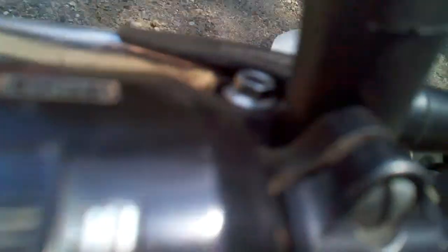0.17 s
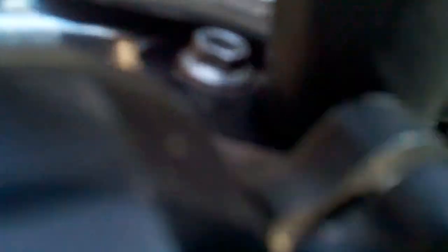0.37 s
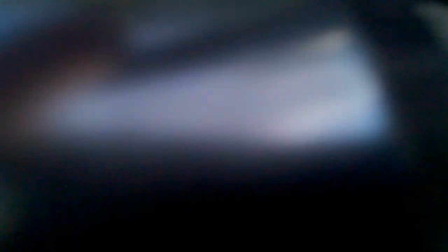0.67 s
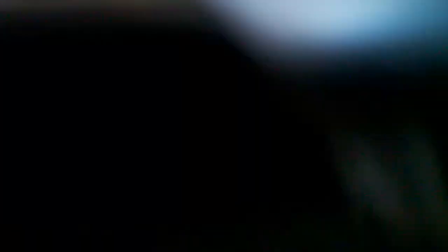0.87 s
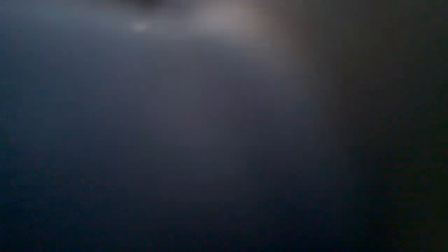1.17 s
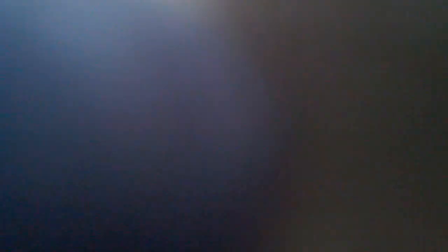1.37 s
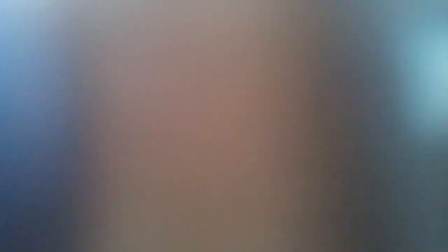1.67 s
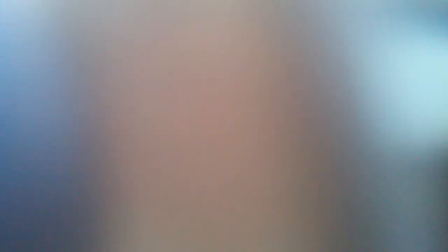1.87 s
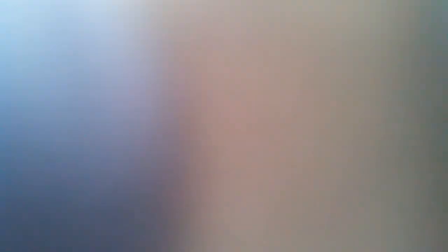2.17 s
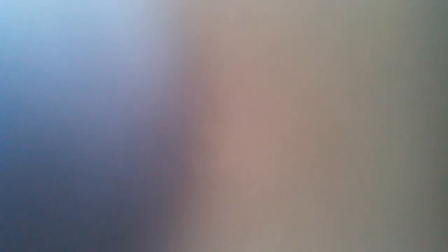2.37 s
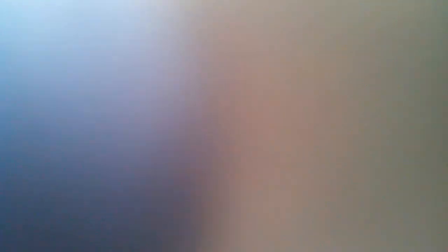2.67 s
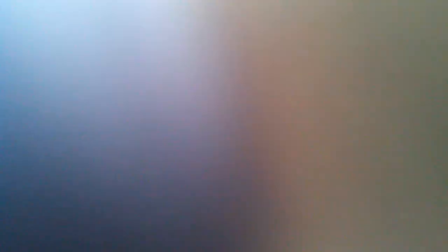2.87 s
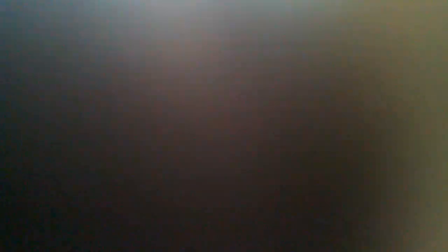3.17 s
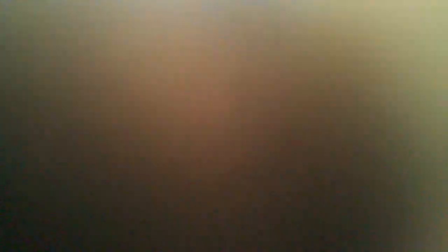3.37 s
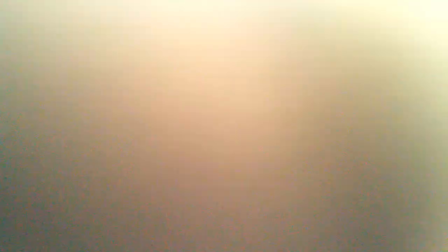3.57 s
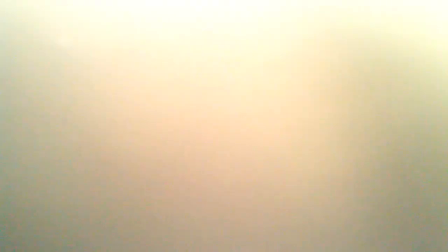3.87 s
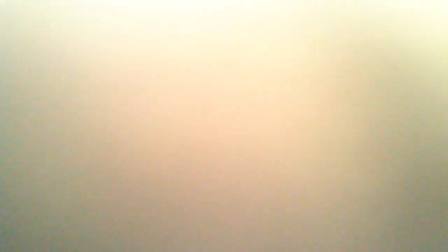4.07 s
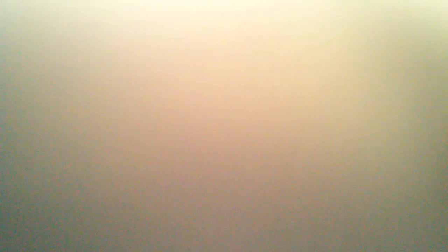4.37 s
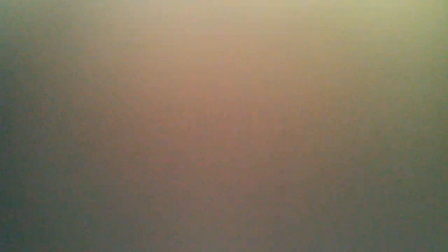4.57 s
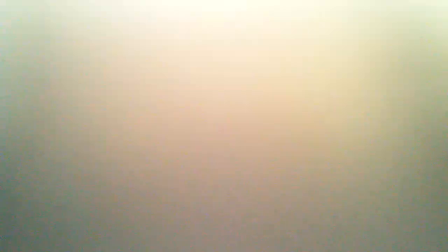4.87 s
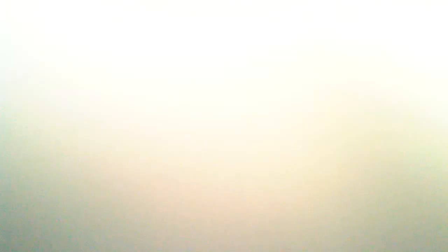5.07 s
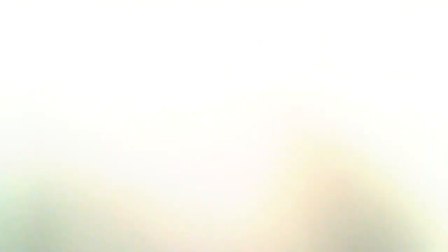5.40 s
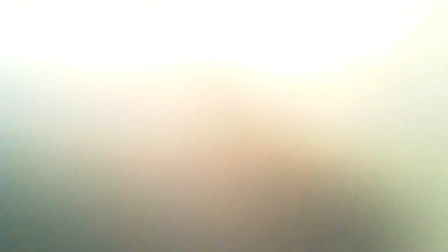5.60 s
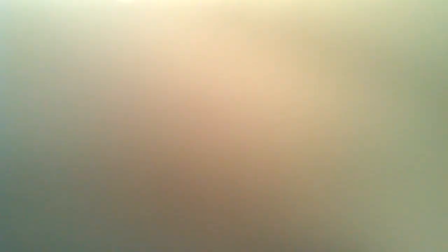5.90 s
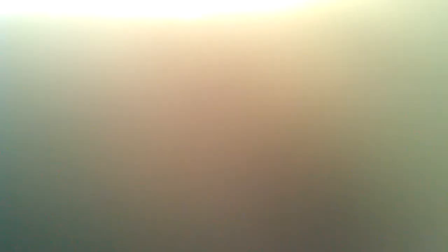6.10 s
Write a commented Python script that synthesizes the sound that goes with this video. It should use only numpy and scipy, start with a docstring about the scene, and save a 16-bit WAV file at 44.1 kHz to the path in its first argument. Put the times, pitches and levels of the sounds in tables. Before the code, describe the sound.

Close up, a two-stroke motorbike sputters irregularly, revs once, stumbles and rides off at a steady buzz with light wind buffeting.

```python
"""Two-stroke dirt bike pulling away.

It idles, firing only on some turns, is blipped, stutters on every second turn and rides off. Gas slugs ring
the pipe; piston slap, ring chatter and gas rush shake casing and fins. A handheld two-port microphone sits
by the frame: the boom fills the left port; clatter and hiss reach both, early and inverted on the left.
Wind buffets the ports once the bike rolls."""
import sys
import numpy as np
from scipy import signal
from scipy.fft import rfft, irfft, next_fast_len
from scipy.io import wavfile
from scipy.ndimage import uniform_filter1d, map_coordinates

SR = 44100
rng = np.random.default_rng(int(sys.argv[2]) if len(sys.argv) > 2 else 0)


def persist_wave(psi):
    """Save psi, clipped to +-1, as 16-bit WAV."""
    counts = np.round(np.clip(psi, -1, 1) * 32767).astype(np.int16)
    wavfile.write(sys.argv[1], SR, np.atleast_2d(counts).T)


N = 275184
TIME_S = np.arange(N) / SR


def exhaust():
    """Pops and puffs at both microphone ports, later and weaker on the right."""
    out = np.zeros((2, N))
    for start_s, wave in [*pops(), *puffs()]:
        lag_s = 0.000067 + 0.00055 * pace(start_s)
        add(out[0], start_s, wave)
        add(out[1], start_s + lag_s, amp(-21.5 + 14.5 * in_open(start_s)) * wave)
    return amp(8.5) * highpass(out, hz=200, order=5)


# Single firings: t/s, boom level/dB, blow-off level/dB
FIRINGS = [(0.0, -15.5, -29.5), (0.145, -19.5, -68), (0.226, -15.5, -35.5), (0.35, -19.5, -62),
           (0.431, -16, -31), (0.512, -23.5, -65), (0.6, -14, -28.5), (0.756, -18, -42), (0.84, -14, -30.5),
           (0.963, -24, -59), (1.008, -10.5, -24.5), (1.254, -9, -23.5), (1.454, -13.5, -41),
           (1.644, -11, -28.5), (1.801, -10, -26.5), (1.948, -15.5, -40), (2.026, -18, -43),
           (2.106, -13.5, -39), (2.186, -19, -65), (2.274, -11.5, -34), (2.409, -10.5, -28),
           (2.636, -10, -28.5), (2.762, -10.5, -23), (2.816, -10.5, -27), (2.838, -11, -28.5),
           (2.857, -11.5, -26), (2.875, -14.5, -37), (3.445, -13, -46), (3.493, -11.5, -16.5),
           (3.587, -10, -13.5), (3.65, -12, -17), (3.712, -11, -24.5), (3.752, -12.5, -21.5),
           (3.794, -14, -66), (3.835, -11.5, -21.5), (3.875, -10, -17.5), (3.919, -13.5, -31),
           (3.963, -12, -18.5), (4.009, -11, -21.5), (4.059, -12, -23.5), (4.106, -12, -24),
           (4.156, -12.5, -25), (4.204, -10.5, -23.5)]


def pops():
    """Single firings boom in the pipe; stronger ones ring higher, with a smaller share of bark."""
    rise_s, loudest_db = .0026, max(db for _, db, _ in FIRINGS)
    for s, db, _ in FIRINGS:
        detune, *side_luck = rng.standard_normal(5)[2:] * roughness(s)
        hz = (pipe_hz(s) + db + 3) * (1 + .012 * detune)
        wave = pipe_ring(s, hz, rise_s, side_luck, hold_s=.0135 if s > 3 else .012,
                         bark_db=-12.5 + 0.1 * (loudest_db - db), side_db=0, tail_db=-15, samples=4400)
        yield s + .001 - rise_s, amp(db) * wave


def blow_off():
    """Envelope of escaping burnt gas: swells before each pop, peaks, lasts until the exhaust port shuts."""
    out, t = np.zeros(N), np.arange(4000) / SR
    before_turns, after_turns = .33, .7
    s, turns = crank()
    for pop_s, _, db in FIRINGS:
        lead_s = pop_s - np.interp(np.interp(pop_s, s, turns) - before_turns, turns, s)
        swell = np.sin(np.pi / 2 * np.clip(t / lead_s, 0, 1)) ** 2
        peak = np.exp(-(np.maximum(t - lead_s, 0) / 0.0094) ** 2)
        port_open = 1 / (1 + np.exp((t - lead_s * (1 + after_turns / before_turns)) / .003))
        add(out, pop_s - lead_s, amp(db) * swell * (1.025 * peak + 0.13 * port_open))
    return out


def puffs():
    """Two puffs a turn, scattered when rough; a pop replaces the first."""
    throttle_shut_s, loaded_from_s = 2.9, 4.23
    pop_s = np.array(FIRINGS)[:, 0]
    first = [(s, 0) for s in turn_times(0) if np.min(abs(pop_s - s)) > .009]
    second = [(s, -14.5 + 12.5 * roughness(s)) for s in turn_times(0.4596)]
    for s, offset_db in first + second:
        rough = roughness(s)
        late, louder, detune, *side_luck = rng.standard_normal(5) * rough
        db = level_db(-28.5, per_effort=1.112, riding_db=4, open_db=-1, at_s=s) + offset_db + 2 * louder
        hz = pipe_hz(s) * (1 + 0.11 * rough * detune) * (1 + .012 * detune)
        softness = (s > throttle_shut_s) * np.clip(1 - (s - throttle_shut_s) / 0.45, 0, 1)
        rise_s = .0033 + 0.0075 * softness
        wave = pipe_ring(s, hz, rise_s, side_luck, hold_s=0.008 if s > loaded_from_s else 0.0063,
                         bark_db=-17, side_db=3.5 * rough, tail_db=-80, samples=2400)
        yield s + .0005 * late + .001 - rise_s, amp(db) * wave


def pipe_hz(at_s):
    """Pipe pitch: up with effort and speed, down as the pipe cools on overrun."""
    return 320.8 + 2 * effort_db(at_s) + 20.1 * min(pace(at_s), 1.6) - 32 * overrun(at_s)


SILENCER = signal.butter(6, 510, fs=SR, output="sos")
# Pipe side tones: f/Hz, level/dB, t60/s
SIDE_TONES = [(416, -13, 0.099), (255, -19.5, 0.027)]


def pipe_ring(at_s, hz, rise_s, side_luck, hold_s, bark_db, side_db, tail_db, samples):
    """A slug of gas rings the pipe until the inverted echo from the cone chokes it."""
    t = np.arange(samples) / SR
    residue, sag_hz_per_s, bark_hz = 0.14, 960, 577
    swell = np.sin(np.pi / 2 * np.minimum(t / rise_s, 1)) ** 2
    choke = residue + (1 - residue) / (1 + np.exp((t - rise_s - hold_s) / .002))
    ring = damped_sine(t, hz, 0, t60_s=0.15) * choke
    side_db = side_db + 5 * in_open(at_s) + 2.5 * overrun(at_s)
    for (side_hz, db, t60_s), luck in zip(SIDE_TONES, side_luck):
        ring += damped_sine(t, side_hz, db + side_db + 2.5 * luck, t60_s) * np.sqrt(choke)
    cooling_tail = damped_sine(t, hz - sag_hz_per_s * t / 2, tail_db, t60_s=0.2)
    ring += cooling_tail * (1 - choke) * np.cos(np.pi / 2 * t / t[-1])
    tailpipe_bark = damped_sine(t, bark_hz, bark_db + 1.5 * in_open(at_s), t60_s=0.036)
    return signal.sosfilt(SILENCER, ring * swell) + tailpipe_bark * swell


# Casing modes: f/Hz, width/Hz, unloaded level/dB, full-load gain/dB
CASING_MODES = [(700, 184, -3, 1), (982, 29.7, 8.5, -11.5), (1103.6, 30.8, 7.5, -10.5), (1211, 26, 5, 1.5),
                (1300, 134, -2.5, 0), (1487, 8.5, -0.5, 6)]
# Fin modes: f/Hz, width/Hz, unloaded level/dB, full-load gain/dB
FIN_MODES = [(1606, 2310, -4, 1.5), (1827, 63, 1.5, -28), (1883, 17.4, 7.5, -7.5), (2130, 422, 3.5, -1),
             (2257, 77, 1.5, 10), (2890, 1390, -3.5, 0), (3346, 650, -6, -16), (3980, 340, -23.5, 19)]
# Exhaust port rasp: f/Hz, width/Hz, unloaded level/dB, full-load gain/dB
RASP_MODES = [(2780, 555, 4, 1)]
# Casing and fin swell: t/s, level/dB
CLATTER_TRIM = [(0, 1), (0.5, -0.5), (1.0, 1.5), (1.6, 2), (2.2, 2), (2.7, 1), (2.85, 4.5), (3.1, 4),
                (3.45, 1), (3.8, 0), (4.2, -0.5), (4.35, 3), (5.3, 2.5), (6.24, 2.5)]


def clatter(gas, slaps, contacts):
    """Piston slap, ring chatter and gas rush shake casing and fins; the exhaust port rasps."""
    grain = chatter_noise()
    chatter = amp(2.2 * drift(53))
    casing_db = level_db(-27.5, per_effort=0.03, riding_db=4.5, open_db=6) - 4 * np.sqrt(overrun())
    casing_hits = grain * (chatter + 0.27 * slaps) + amp(-2.5) * contacts
    casing = resonate(amp(casing_db) * casing_hits + amp(-8) * gas * grain, CASING_MODES)
    fin_db = level_db(-30, per_effort=0.4952, riding_db=0, open_db=-1)
    fin_slaps = slaps * np.maximum(np.sqrt(roughness()), 0.28)
    fin_hits = grain * (.62 * chatter + 1.7 * fin_slaps) + .9 * contacts
    fins = resonate(amp(fin_db) * fin_hits + amp(0.5) * gas * grain, FIN_MODES)
    rasp_db = -40.5 + 11 * np.clip(pace(), 0, 1) * (1 - overrun())
    rasp = resonate((amp(rasp_db) + amp(0.5) * gas) * grain, RASP_MODES)
    return amp(curves(CLATTER_TRIM)[0]) * (casing + fins) + rasp


def piston_slaps():
    """Two slaps a turn: their envelope and their first-contact impulses, harder when rough."""
    slaps, contacts, t = np.zeros(N), np.zeros(N), np.arange(900) / SR
    shape = np.minimum(t / .0004, 1) * np.exp(-t / .0038)
    for offset_turns, db in [(.65, 8.5), (.1, -3)]:
        times = turn_times(offset_turns)
        times += .0008 * rng.standard_normal(len(times)) * np.sqrt(roughness(times))
        for s, rough, luck in zip(times, roughness(times), rng.standard_normal(len(times))):
            add(slaps, s, amp(db + 1.2 * luck * rough) * shape)
            add(contacts, s, amp([db + 14 + (6 + luck) * rough]))
    return slaps, contacts


def chatter_noise():
    """Gears and rings: fresh noise when rough, partly a crank-locked, slowly changing pattern when smooth."""
    pattern_s, points = .22, 400
    patterns = rng.standard_normal((int(N / SR / pattern_s) + 2, points))
    row, column = TIME_S / pattern_s, crank_turns() % 1 * (points - 1)
    locked = unit(map_coordinates(patterns, [row, column], order=1) / np.hypot(row % 1, 1 - row % 1))
    share = .42 * (1 - roughness()) * np.clip(2 * load() + overrun() / 2, 0, 1)
    return np.sqrt(1 - share) * rng.standard_normal(N) + np.sqrt(share) * locked


def resonate(drive, modes):
    """Parallel resonances of alternating sign; the load shifts their balance."""
    out = 0
    for k, (hz, width_hz, db, load_db) in enumerate(modes):
        r = np.exp(-np.pi * width_hz / SR)
        gain = (1 - r * r) / 2
        ring = signal.lfilter([gain, 0, -gain], [1, -2 * r * np.cos(2 * np.pi * hz / SR), r * r], drive)
        out += (-1) ** k * amp(db + load_db * load() + 1.1 * drift(9)) * ring
    return out


# Air box growl: t/s, f/Hz, level/dB
GROWL = [(2.66, 189.3, -52), (2.71, 199.3, -21), (2.745, 238.7, -10.5), (2.8, 258.6, -12),
         (2.86, 279.6, -19), (2.9, 268, -17), (2.94, 274, -70)]


def intake():
    """The opened throttle gulps once a turn through the air box."""
    hz, db = curves(GROWL)
    gulp = (.5 + .5 * np.cos(2 * np.pi * (crank_turns() - .1))) ** .8 * amp(3 * drift(50))
    cycles = np.cumsum(hz * (1 + 0.1 * drift(40))) / SR
    return highpass(amp(db) * gulp * np.sin(2 * np.pi * cycles), hz=170, order=4)


# Crank harmonics: order, level/dB
SHAKE_ORDERS = [(2, -17.5), (3, -3), (4, 12), (5, 13), (6, 19)]


def crank_shake():
    """Low crank harmonics hum through the frame, most near its resonance."""
    frame_hz, width_hz = 113, 22
    turns, crank_hz, hum = crank_turns(), curves(CRANK_SPEED)[0], 0
    for order, db in SHAKE_ORDERS:
        off_resonance = np.hypot(1, 2 * (order * crank_hz - frame_hz) / width_hz)
        hum += amp(db + 2.5 * drift(7)) / off_resonance * np.sin(2 * np.pi * order * turns)
    shake_db = level_db(-47.5, per_effort=1.303, riding_db=10.5, open_db=-4) - 1.5 * overrun()
    return amp(shake_db) * unit(hum)


# Stone hits: t/s, level/dB
STONES = [(5.864, -10.5), (5.9085, -28)]


def stone_knocks():
    """The frame rattles over stones."""
    out, t = np.zeros(N), np.arange(600) / SR
    for s, db in STONES:
        add(out, s, amp(db) * np.sin(2 * np.pi * 1600 * t) * np.exp(-t / 0.00092))
    return out


# Hiss spectrum: f/Hz, density/dB
HISS_SPECTRUM = [(2500, -27.5), (4000, -7), (5300, -5.5), (6500, -2), (7800, 2), (9000, -3), (10600, -6),
                 (12500, -14), (14500, 3)]
# Steady hiss: t/s, level/dB
HISS_ENVELOPE = [(0, -49), (1.0, -47), (1.9, -44), (2.7, -50.5), (2.8, -44), (2.9, -35), (2.99, -32),
                 (3.1, -36), (3.3, -37), (3.45, -40.5), (3.75, -36), (4.15, -40.5), (4.3, -26.5),
                 (4.8, -26.5), (5.1, -25), (5.35, -24), (5.6, -25.5), (5.9, -25), (5.93, -34),
                 (5.99, -26.5), (6.24, -29)]


def hiss(gas, slaps):
    """Left and right hiss, partly alike: surges with the gas, ticks with rough slaps, swells by band."""
    ticking = 1 + slaps * roughness()
    envelope = amp(curves(HISS_ENVELOPE)[0] + 1.1 * drift(44)) * ticking + gas
    rest = np.array([noise(HISS_SPECTRUM), noise(HISS_SPECTRUM)])
    bands, swell_db, alike = 0, 1.5, .45
    for split_hz in (1800, 3860, 13000):
        above = signal.sosfiltfilt(signal.butter(2, split_hz, "high", fs=SR, output="sos"), rest)
        bands += amp(swell_db * drift(5.7)) * (rest - above)
        rest = above
    shared, own = envelope * (bands + amp(swell_db * drift(11.5)) * rest)
    return alike * shared + np.sqrt(1 - alike ** 2) * own, shared


# Rumble spectrum: f/Hz, density/dB
RUMBLE_SPECTRUM = [(25, -38), (50, -25), (80, -4), (115, 20), (160, -22), (250, -23), (500, 12), (900, -36)]


def engine_rumble():
    """Low engine noise, strongest with the microphone against the frame."""
    db = level_db(-52, per_effort=0.5, riding_db=3.5, open_db=-21)
    return amp(db + 0.5 * drift(25)) * noise(RUMBLE_SPECTRUM)


# Wind spectrum: f/Hz, density/dB
WIND_SPECTRUM = [(25, -27), (60, -15), (100, -7.5), (150, -2), (250, 3), (400, -3), (550, -11), (900, -57)]
# Wind at the ports: t/s, left level/dB, right level/dB
WIND_ENVELOPE = [(0, -63, -43), (2.6, -48.5, -44), (3.2, -37, -44), (3.8, -27, -42), (4.4, -33, -46),
                 (5.0, -40, -38.5), (5.5, -24, -26), (5.9, -30, -26.5), (6.24, -27.5, -25.5)]


def wind():
    """Wind pushes the two ports mostly in opposite ways, gustier once the bike rolls."""
    left_db, right_db = curves(WIND_ENVELOPE)
    gust_db = 3 * drift(14) * np.clip(TIME_S - 4, .3, 1)
    left, opposed = noise(WIND_SPECTRUM), 0.84
    right = np.sqrt(1 - opposed ** 2) * noise(WIND_SPECTRUM) - opposed * left
    return amp(left_db + gust_db) * left, amp(right_db + gust_db) * right


# Nominal crank speed: t/s, f/Hz
CRANK_SPEED = [(0, 26.05), (.95, 23.64), (1.15, 30.22), (1.4, 28.98), (1.6, 25.3), (1.9, 26.84),
               (2.3, 22.64), (2.4, 22.3), (2.42, 26.24), (2.62, 26.24), (2.66, 30.6), (2.76, 32.1),
               (2.875, 55.6), (3.42, 40.1), (3.7, 49.8), (4.15, 39.78), (4.3, 44.02), (4.47, 43.9),
               (4.6, 45.3), (4.7, 42.8), (5.4, 44.13), (5.9, 44.3), (6.0, 41.19), (6.24, 43.76)]


def crank():
    """Times and turn count: the speed hunts slightly; each lone pop pulls the count to a whole turn."""
    hunt_turns, hunt_hz, coast_hz_per_s, idle_until_s = .035, 2.25, 22, 2.64
    s = np.arange(-50, N * 1000 // SR + 100) / 1000
    turns = np.cumsum(curves(CRANK_SPEED, s)[0]) / 1000
    turns = turns - np.interp(0, s, turns) + hunt_turns * np.sin(2 * np.pi * hunt_hz * (s - 5.05))
    pop_s = np.array(FIRINGS)[:, 0]
    pop_s = pop_s[np.diff(pop_s, append=9) > .03]
    at_pop = np.interp(pop_s, s, turns)
    pull = np.interp(s, pop_s, np.round(at_pop) - at_pop)
    after = np.clip(np.searchsorted(pop_s, s), 1, len(pop_s) - 1)
    # At idle the flywheel slows between pops.
    coast = coast_hz_per_s / 2 * np.maximum((s - pop_s[after - 1]) * (pop_s[after] - s), 0)
    return s, turns + pull + coast * (s < idle_until_s)


def crank_turns():
    """Turn count per sample."""
    return np.interp(TIME_S, *crank())


def turn_times(offset_turns):
    """Times the crank passes one angle, each averaged with its neighbours over three turns."""
    s, turns = crank()
    whole = np.arange(np.ceil(turns[0]), np.floor(turns[-1]) + 1)
    even_s = uniform_filter1d(np.interp(whole, turns, s), size=3, mode="nearest")
    return np.interp(whole[:-1] + offset_turns, whole, even_s)


def pace(at_s=TIME_S):
    """Crank speed: 0 at idle, 1 at riding speed."""
    idle_hz, riding_hz = 26, 44
    return (curves(CRANK_SPEED, at_s)[0] - idle_hz) / (riding_hz - idle_hz)


# Engine effort: t/s, level/dB
ENGINE_EFFORT = [(0, 2), (1.0, 2), (1.9, 3), (2.5, 3.5), (2.71, 2.5), (2.82, 3), (2.9, 6), (3.0, 8),
                 (3.15, 7.5), (3.3, 10), (3.44, 6.5), (3.55, 4), (3.7, 6), (3.93, 2.5), (4.15, 6),
                 (4.34, 11.5), (4.83, 13), (5.33, 13.5), (5.87, 13), (6.24, 13.5)]


def effort_db(at_s):
    """How hard the engine works."""
    return curves(ENGINE_EFFORT, at_s)[0]


# Rough running: t/s, share/0-1
UNEVENNESS = [(0, 1), (2.85, 1), (2.92, .08), (3.2, .1), (3.5, .8), (4.25, .6), (4.35, .2), (5.8, .2),
              (5.87, .6), (6.0, .25)]


def roughness(at_s=TIME_S):
    """How uneven the turns are."""
    return curves(UNEVENNESS, at_s)[0]


# Overrun: t/s, share/0-1
COAST_DOWN = [(2.88, 0), (2.93, .3), (3.36, 1), (3.44, 0)]


def overrun(at_s=TIME_S):
    """Throttle shut, engine coasting down."""
    return curves(COAST_DOWN, at_s)[0]


# Chain load: t/s, share/0-1
CHAIN_PULL = [(0, 0), (4.1, 0.19), (4.35, 0.33), (5.0, 0.52), (5.35, 0.68), (6.24, 0.56)]


def load():
    """Share of full pull on the chain."""
    return curves(CHAIN_PULL)[0]


def in_open(at_s=TIME_S):
    """Microphone position: 1 in the open, 0 tucked against the frame."""
    return np.interp(at_s, [0.92, 1.25], [1, 0])


def level_db(base_db, per_effort, riding_db, open_db, at_s=TIME_S):
    """Layer level from effort, speed and microphone position."""
    return base_db + per_effort * effort_db(at_s) + riding_db * pace(at_s) + open_db * in_open(at_s)


def amp(db):
    """dB to gain."""
    return 10 ** (np.asarray(db) / 20)


def unit(x):
    """Scale to rms 1."""
    return x / np.sqrt(np.mean(x ** 2) + 1e-20)


def curves(rows, at_s=TIME_S):
    """Table columns interpolated in time."""
    s, *columns = np.transpose(rows)
    return [np.interp(at_s, s, column) for column in columns]


def damped_sine(t, hz, db, t60_s):
    """Sine falling 60 dB in t60_s."""
    return amp(db - 60 * t / t60_s) * np.sin(2 * np.pi * hz * t)


def highpass(x, hz, order):
    """Butterworth high-pass."""
    return signal.sosfilt(signal.butter(order, hz, "high", fs=SR, output="sos"), x)


def noise(spectrum):
    """Shaped noise, rms 1."""
    size = next_fast_len(N)
    hz, db = np.transpose(spectrum)
    bin_hz = np.arange(size // 2 + 1) * SR / size
    shape = amp(np.interp(np.log(bin_hz + 1), np.log(hz), db))
    return unit(irfft(rfft(rng.standard_normal(size)) * shape, size)[:N])


def drift(hz):
    """Slow random wobble, rms 1."""
    lowpass = signal.butter(2, hz, fs=SR, output="sos")
    return unit(signal.sosfilt(lowpass, rng.standard_normal(N + SR))[SR:])


def add(out, at_s, wave):
    """Mix a short wave into the track."""
    i = int(round(at_s * SR))
    low, high = max(i, 0), min(i + len(wave), N)
    if high > low:
        out[low:high] += wave[low - i:high - i]


def scene():
    """Both ports; the left gets most of the boom, and clatter, rumble and hiss early and inverted."""
    echo_s, lead_samples = .006, 17
    gas = blow_off()
    slaps, contacts = piston_slaps()
    metal = clatter(gas, slaps, contacts) + stone_knocks()
    left_hiss, right_hiss = hiss(gas, slaps)
    rumble, shake = engine_rumble(), crank_shake()
    left_wind, right_wind = wind()
    gulps = intake()
    frame_echo = amp(-11) * np.roll(metal, int(echo_s * SR))
    left_air = metal + rumble + frame_echo + left_hiss
    left = gulps + shake - np.roll(left_air, -lead_samples) + left_wind
    right_air = metal + rumble + right_hiss
    right = amp(-14) * gulps + (0.015 + 1.24 * in_open()) * shake + right_air + right_wind
    return exhaust() + np.array([left, right])


def record(dry):
    """Peaks rounded, deep bass rolled off, top cut."""
    rounded = np.tanh(dry / 1.5) * 1.5
    top_cut = signal.cheby2(12, 60, 14500, fs=SR, output="sos")
    return signal.sosfilt(top_cut, highpass(rounded, hz=50, order=1))


dry = scene()
out = record(dry)
persist_wave(out)
```